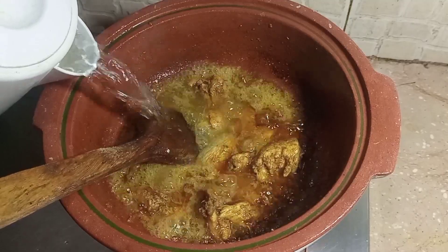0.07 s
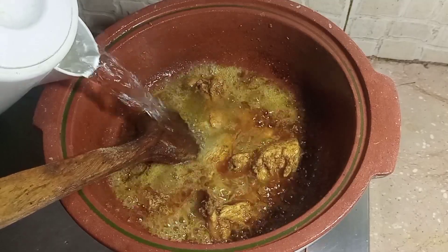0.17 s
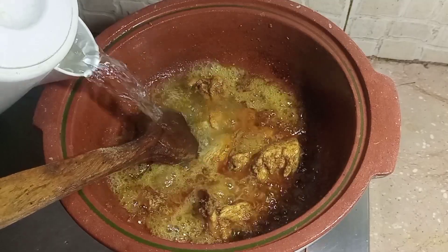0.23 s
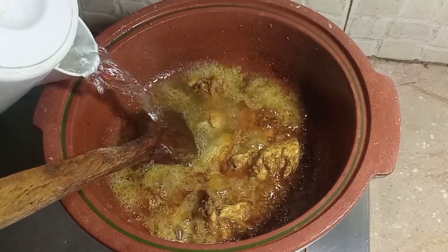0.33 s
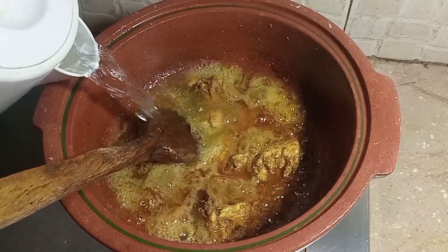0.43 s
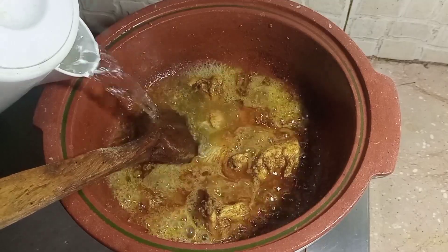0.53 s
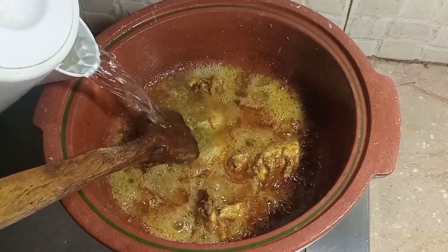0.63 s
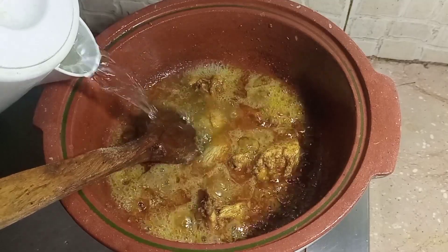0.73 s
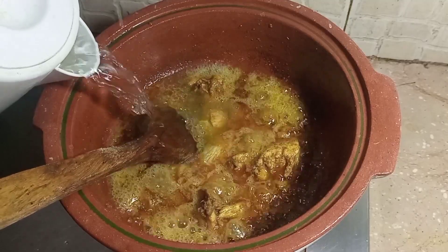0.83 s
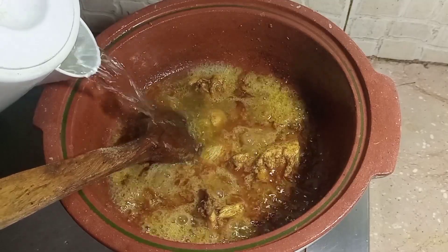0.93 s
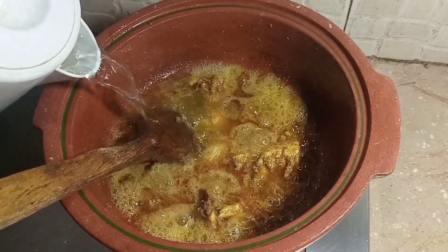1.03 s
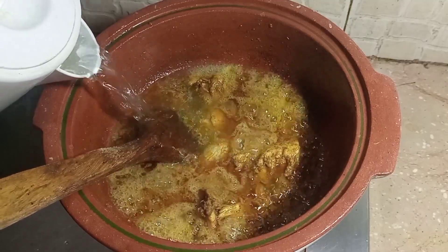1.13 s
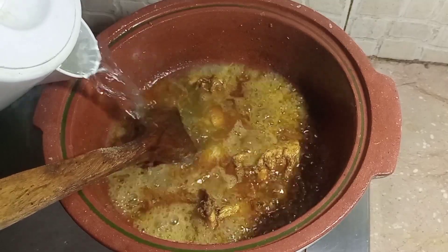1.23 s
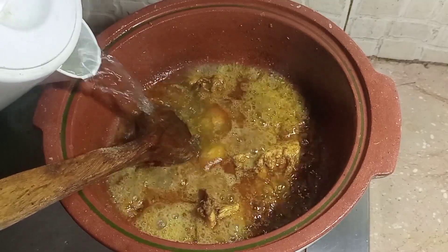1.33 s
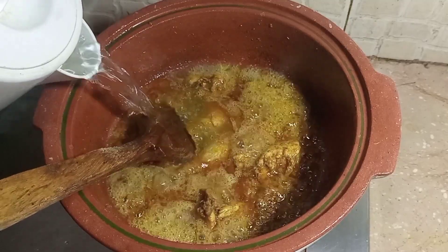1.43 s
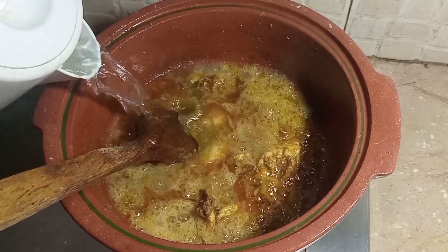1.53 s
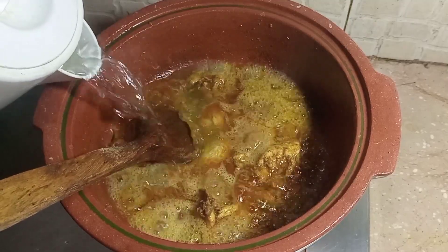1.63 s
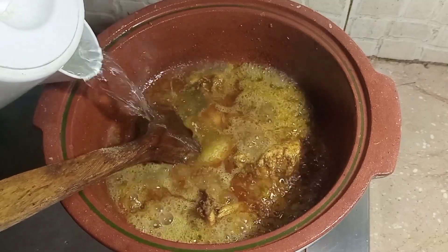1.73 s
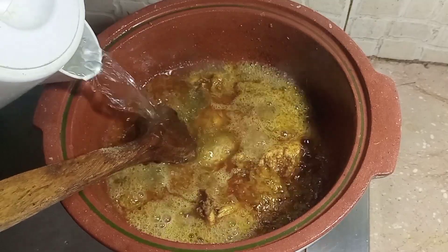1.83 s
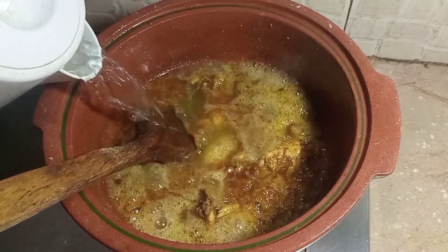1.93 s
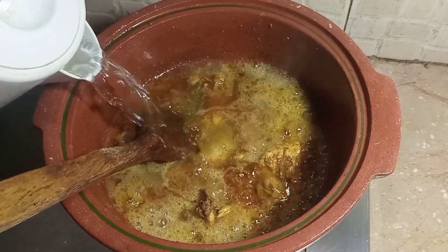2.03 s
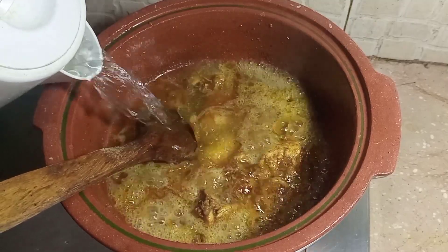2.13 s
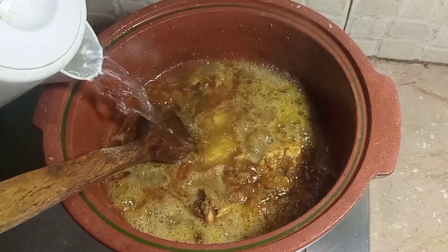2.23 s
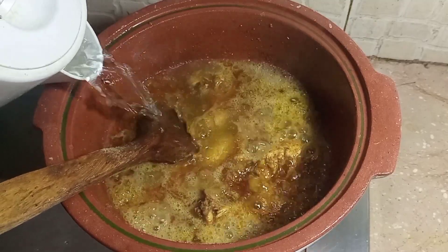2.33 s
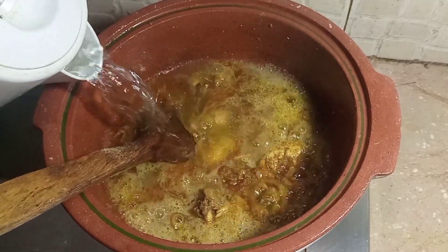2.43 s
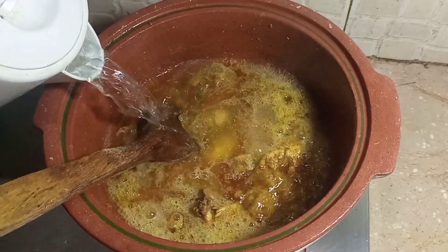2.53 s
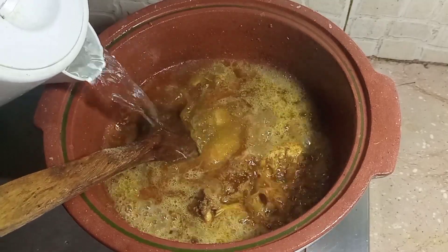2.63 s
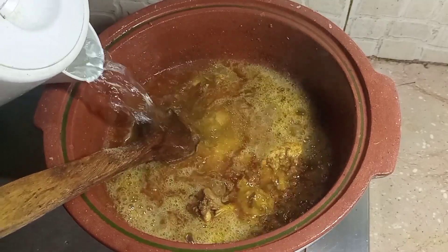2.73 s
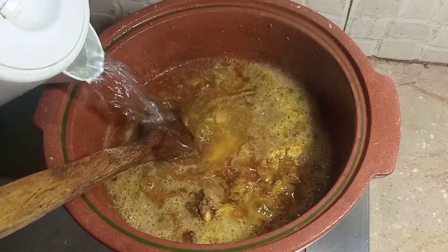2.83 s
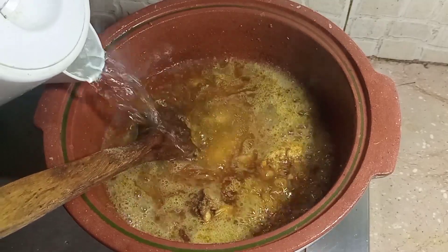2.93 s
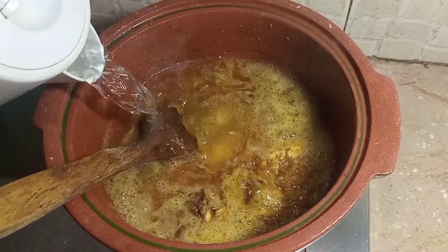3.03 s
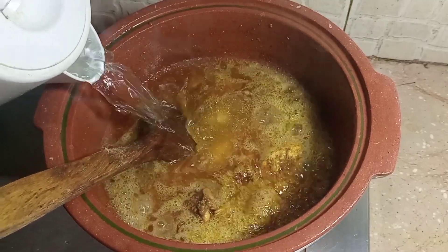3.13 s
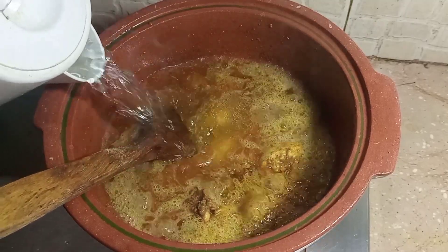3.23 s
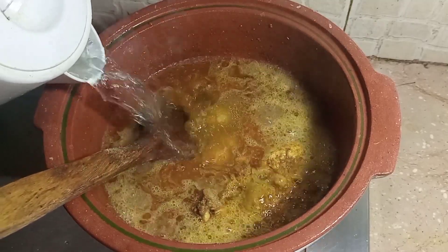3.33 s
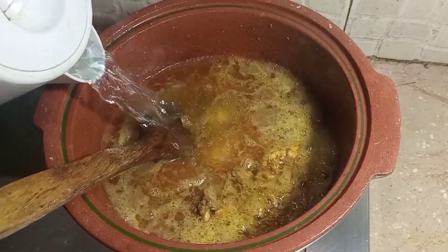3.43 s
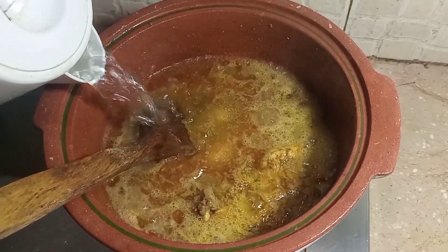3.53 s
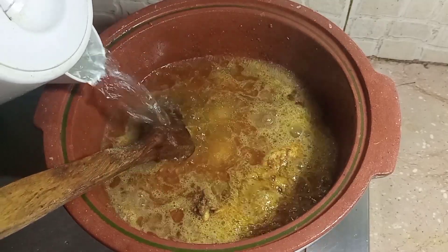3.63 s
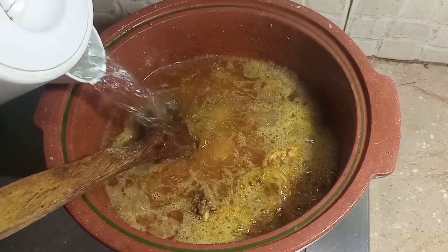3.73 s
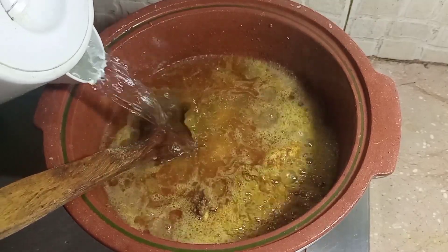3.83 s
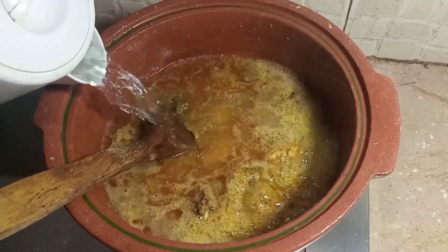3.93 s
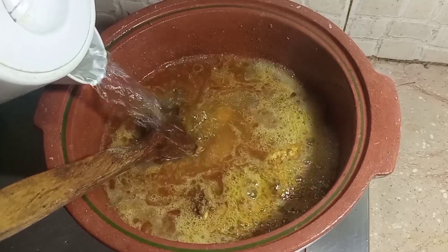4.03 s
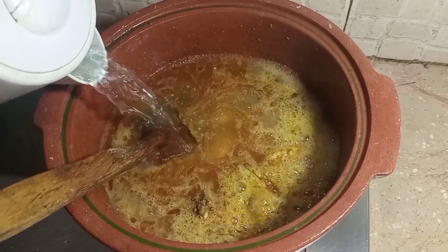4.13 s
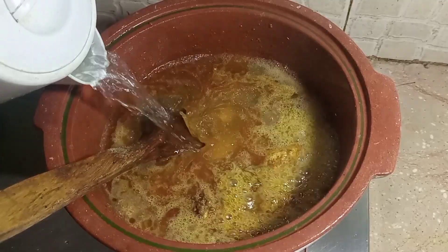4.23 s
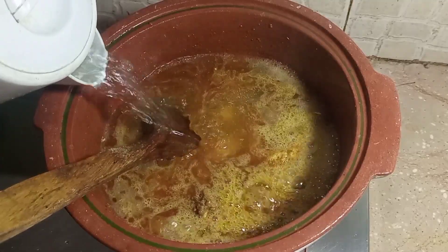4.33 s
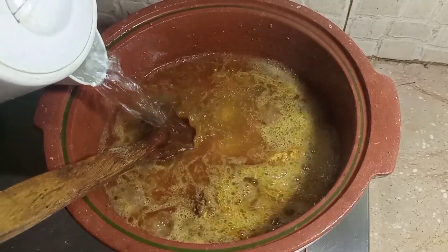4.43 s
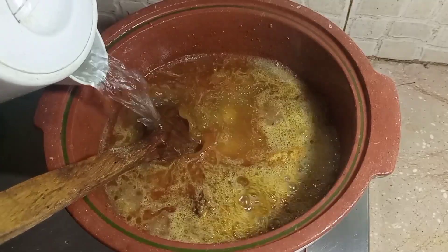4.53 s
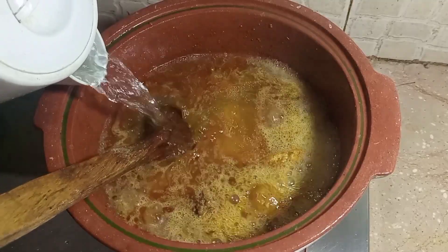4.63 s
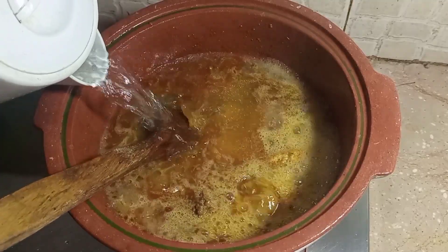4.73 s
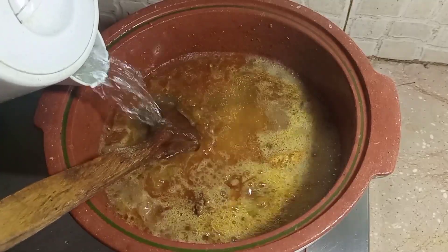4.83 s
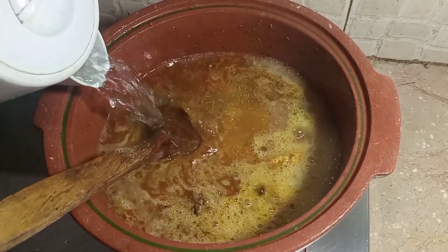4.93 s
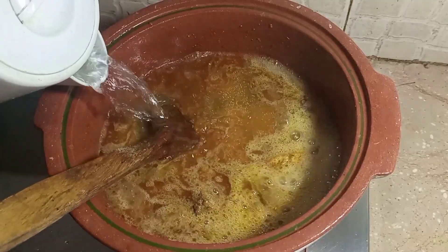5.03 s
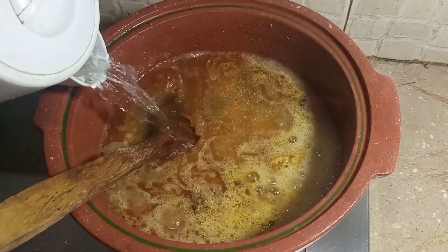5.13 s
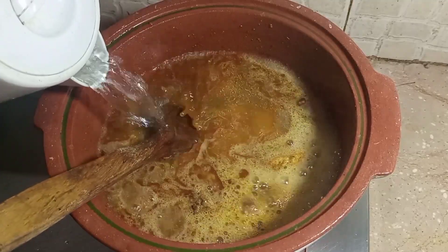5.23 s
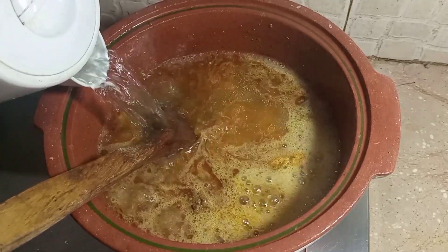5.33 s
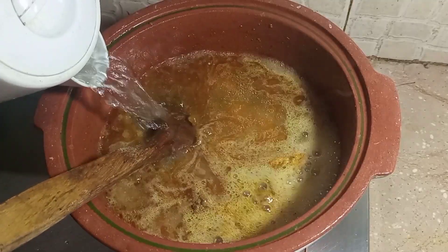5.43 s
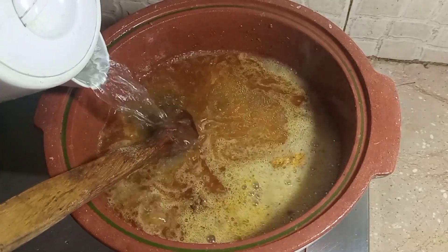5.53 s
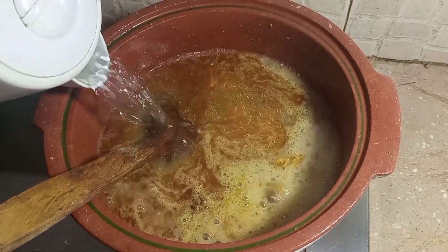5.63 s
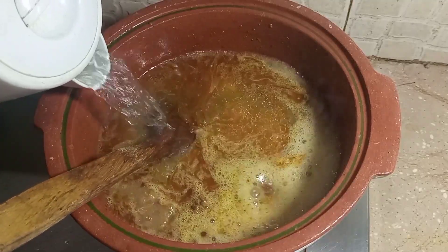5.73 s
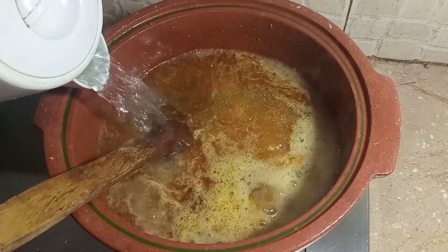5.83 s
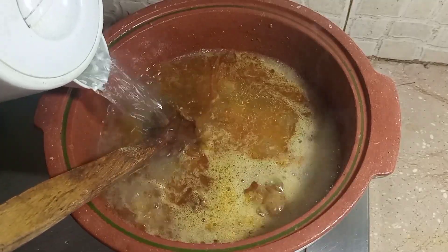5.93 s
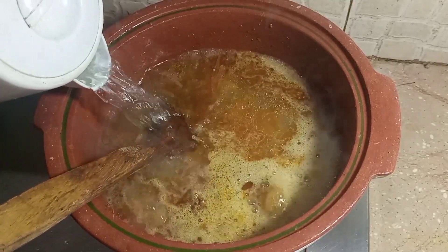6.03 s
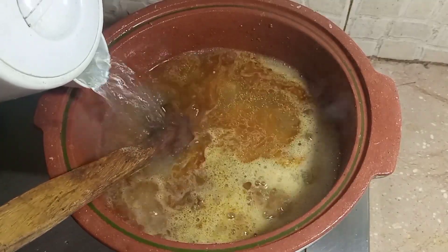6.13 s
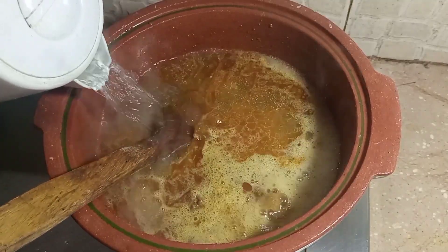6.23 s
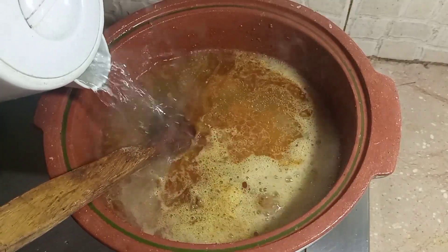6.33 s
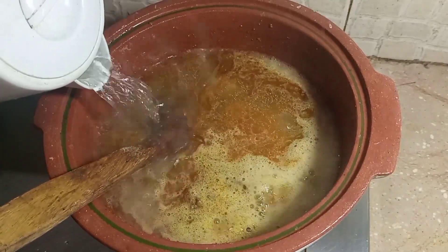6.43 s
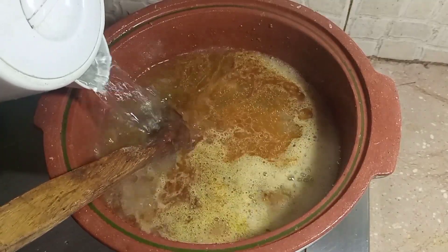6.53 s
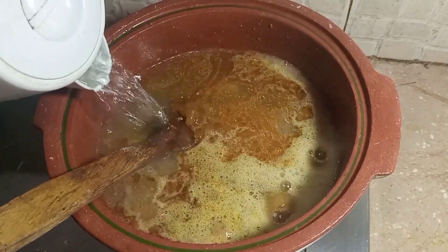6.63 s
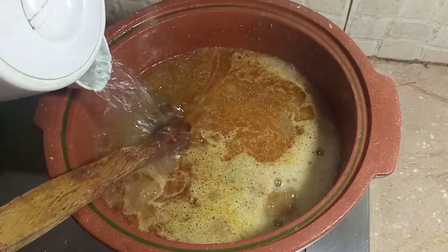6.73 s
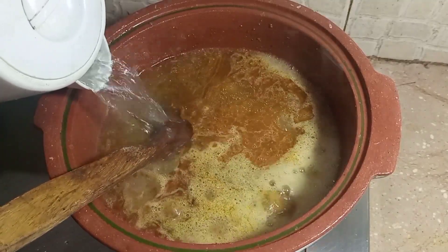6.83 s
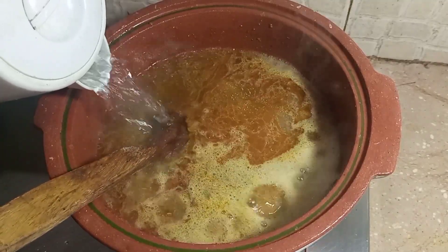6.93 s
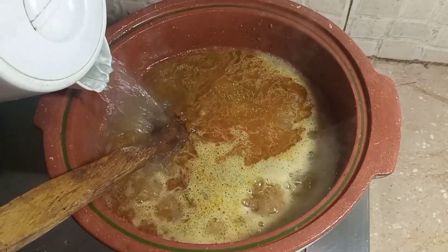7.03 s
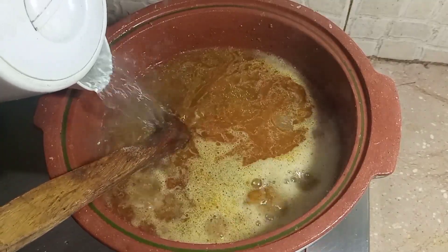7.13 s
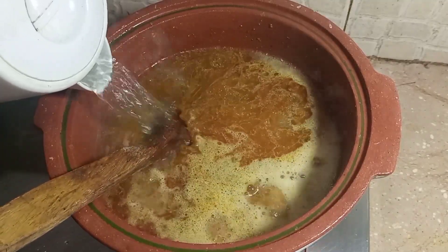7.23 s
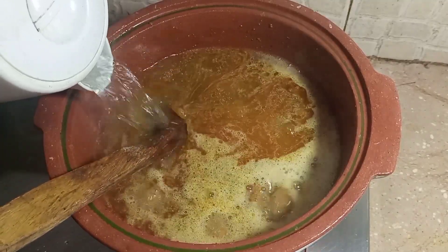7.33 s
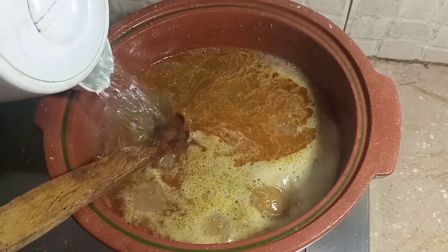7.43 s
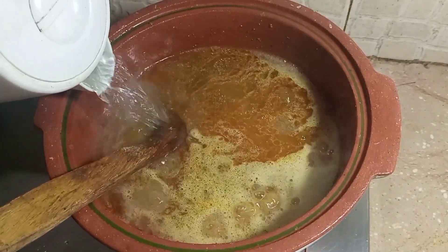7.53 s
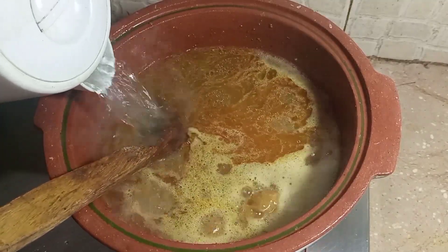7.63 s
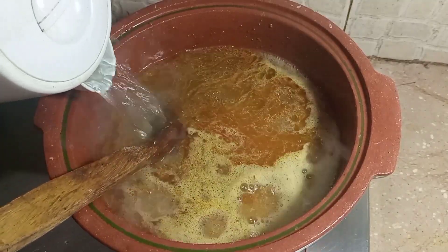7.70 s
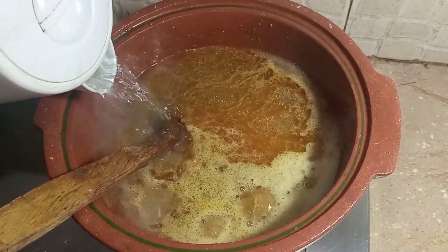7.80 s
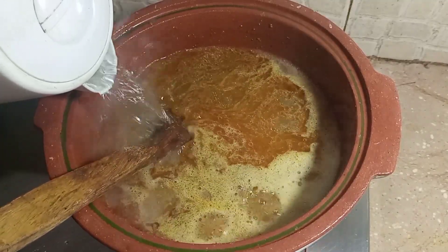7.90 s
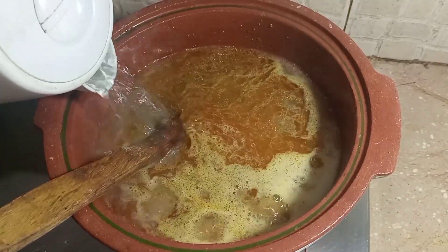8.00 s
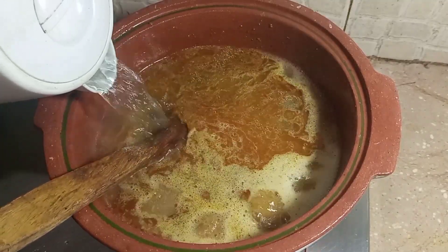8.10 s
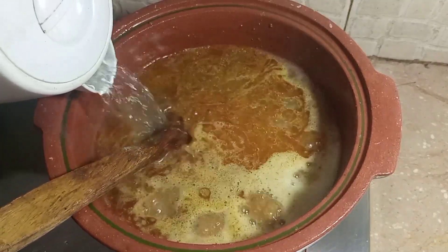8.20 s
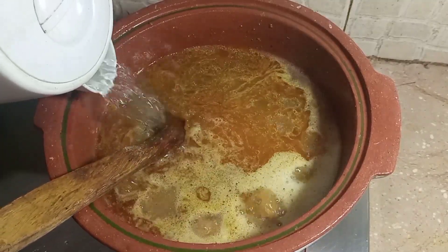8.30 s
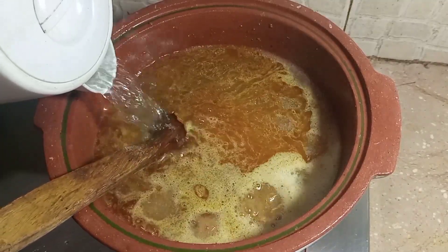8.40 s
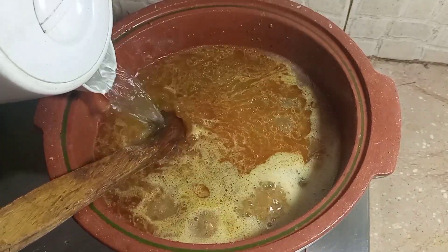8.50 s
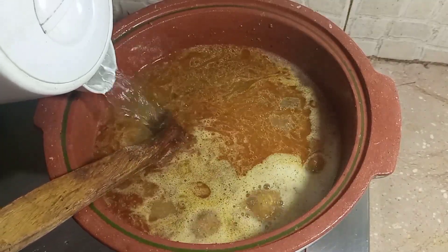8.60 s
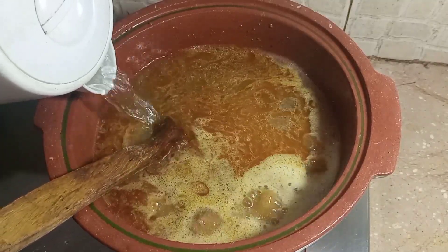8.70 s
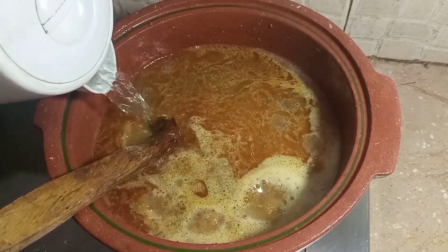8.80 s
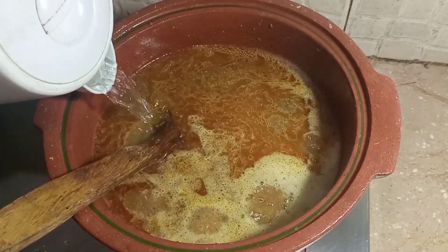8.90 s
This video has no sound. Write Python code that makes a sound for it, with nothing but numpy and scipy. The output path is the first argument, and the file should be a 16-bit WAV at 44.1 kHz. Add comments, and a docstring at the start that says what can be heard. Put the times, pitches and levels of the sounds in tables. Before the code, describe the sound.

Close to a clay pot in a tiled kitchen, poured water meets hot oil with a loud, bright, crackling sizzle. It surges early, with sharp snaps and spits, then weakens sharply around the middle as the pot cools. Gurgles, plops and dull thuds become clearer over a thinning simmer, and a soft hollow hoot sounds near the end.

```python
"""A loud sizzle, made of countless tiny steam bursts, thins to a simmer as the pot cools.
Water runs from a jug into a clay pot of chicken frying in hot oil, in a tiled kitchen.
Random clicks excite resonances for the sizzle and gurgle; damped, rising sines make bubbles, plops and drips.
Oil spits and thuds add shaped noise, glugs are wobbling tones; near the end comes one soft hollow hoot."""
import sys
import numpy as np
from scipy import signal
from scipy.fft import rfft, irfft
from scipy.io import wavfile

SR = 44100
rng = np.random.default_rng(int(sys.argv[2]) if len(sys.argv) > 2 else 0)


def unload_audio(sound):
    """Save the sound as a 16-bit wav file, at the path given as the first command line argument."""
    columns = np.transpose(np.atleast_2d(sound))
    # keep every value between -1 and 1, then stretch to whole-number steps
    steps = np.round(np.clip(columns, -1, 1) * 32767)
    wavfile.write(sys.argv[1], SR, steps.astype(np.int16))


N = 395116
TIME = np.arange(N) / SR
CUTOFF_HZ = 15480


def from_db(db):
    """Decibels to gain."""
    return 10 ** (np.asarray(db) / 20)


def rms_one(x):
    """Scale to rms 1."""
    return x / np.sqrt(np.mean(x ** 2) + 1e-20)


def in_time(rows):
    """Interpolate each column of a time curve to every sample."""
    s, *columns = np.transpose(rows)
    return [np.interp(TIME, s, column) for column in columns]


def highpass(x, order, hz):
    """Butterworth high-pass."""
    return signal.sosfilt(signal.butter(order, hz, "high", fs=SR, output="sos"), x)


def drift(rate_hz):
    """Slow random curve of rms 1: noise through two equal poles at rate_hz."""
    step = 40  # samples per point of the slow curve
    settling = 2000  # points dropped while the filter settles
    r = np.exp(-2 * np.pi * rate_hz * step / SR)
    noise = rng.standard_normal(N // step + settling + 2)
    slow = rms_one(signal.lfilter([1], [1, -2 * r, r * r], noise)[settling:])
    return np.interp(np.arange(N) / step, np.arange(len(slow)), slow)


def colour(x, spectrum, size=4096):
    """Causal minimum-phase filter with the given spectrum, built by folding its cepstrum."""
    hz, db = np.transpose(spectrum)
    grid_hz = np.maximum(np.arange(size // 2 + 1) * SR / size, 1)
    gain = from_db(np.interp(np.log(grid_hz), np.log(hz), db))
    cepstrum = irfft(np.log(gain))
    cepstrum[1:size // 2] *= 2
    cepstrum[size // 2 + 1:] = 0
    impulse = irfft(np.exp(rfft(cepstrum)))
    return signal.oaconvolve(x, impulse)[:N]


def resonate(x, hz, width_hz):
    """One two-pole resonance, gain 1 at its peak."""
    r = np.exp(-np.pi * width_hz / SR)
    zeros = np.array([1, 0, -1]) * (1 - r * r) / 2
    poles = [1, -2 * r * np.cos(2 * np.pi * hz / SR), r * r]
    return signal.lfilter(zeros, poles, x + 1e-18)


def add(out, s, sound):
    """Mix a short sound in at time s."""
    start = max(round(s * SR), 0)
    out[start:start + len(sound)] += sound[:N - start]


def bursts(per_s, spread_db):
    """Random clicks of uneven size; their power stays the same whatever their rate."""
    chance = np.clip(per_s / SR, 1e-5, 1) * np.ones(N)
    at = np.flatnonzero(rng.random(N) < chance)
    size = from_db(spread_db * np.minimum(rng.exponential(1, len(at)), 4))
    sign = rng.choice([-1, 1], len(at))
    out = np.zeros(N)
    out[at] = size * sign / np.sqrt(chance[at])
    return rms_one(out)


def bubbles(per_s, low_hz, high_hz, sharpness, spread_db, patchy_db, count=14):
    """Bubbles of many sizes ring for a few cycles each; every size comes in its own flurries."""
    out = 0
    for hz in np.geomspace(low_hz, min(high_hz, CUTOFF_HZ), count):
        ringing = resonate(bursts(per_s / count, spread_db), hz, hz / sharpness)
        out = out + ringing * from_db(patchy_db * drift(22.0))
    return rms_one(out)


def pop(hz, cycles, rise, size=2600):
    """A bubble: a sine damped by 1/e every `cycles`, its pitch climbing for two decay times."""
    turns = hz * TIME[:size]
    decays = turns / cycles
    phase = 2 * np.pi * turns * (1 + rise * np.minimum(decays, 2))
    return np.sin(phase) * np.exp(-np.minimum(decays, 40))


def tail(t60_s, size=22050):
    """A dense echo train of unit energy that dies away."""
    t = np.arange(size) / SR
    echoes = rng.standard_normal(size) * from_db(-60 * t / t60_s) * (t > .0007)
    return echoes / np.linalg.norm(echoes)


POT_T60_S = 0.12


def scatter(x, wet_db):
    """Each spot in the pot has its own short train of echoes off the clay walls."""
    return x + from_db(wet_db) * signal.oaconvolve(x, tail(POT_T60_S, size=2600))[:len(x)]


# vigour of the frying: t/s, fine sizzle level/dB, coarse crackle level/dB, finest spray level/dB
FRYING = [(0.0, -48, -49.5, -58), (1.27, -42, -47.5, -48.5), (2.67, -45, -47, -52),
          (3.69, -42.5, -49.5, -49.5), (3.92, -42, -52, -50), (4.44, -47, -53.5, -52.5),
          (4.79, -53, -56, -58.5), (5.66, -57, -60, -64.5), (6.93, -58, -61, -66),
          (8.46, -63, -66.5, -71.5), (8.96, -63.5, -67.5, -70.5)]
# spectrum of each sizzle layer: f/Hz, level/dB
SIZZLE_COLOUR = [(1500, -26), (3000, -12.5), (4500, -9.5), (5400, -2), (6000, 1.5), (6600, 2.5), (7400, 1),
                 (8200, -7.5), (9500, -10.5), (12000, -37.5), (16000, -6.5)]
CRACKLE_COLOUR = [(900, -32.5), (1700, -16.5), (2300, -6), (3000, -4), (3700, -2), (4600, 0), (5600, -6),
                  (8000, -21.5), (16000, -32.5)]
SPRAY_COLOUR = [(3000, -16), (7000, 7), (9500, 4.5), (11500, 0.5), (13500, 1), (16000, -5.5)]


def sizzle():
    """Droplets flash to steam: sharp snaps and tiny ringing bubbles, fewer as the frying weakens."""
    fine_db, coarse_db, spray_db = in_time(FRYING)
    per_s = 16000 * from_db(.5 * (fine_db - fine_db.max()))
    surge = from_db(1.0 * drift(33.0))  # the stream lands unevenly
    cracks = rms_one(sum(scatter(bursts(per_s * .12, spread_db=4.0), wet_db=-1.0) for spot in range(4)))

    fine = bubbles(per_s, 4050, 8420, sharpness=12.3, spread_db=3.5, patchy_db=1.5)
    fine = rms_one(colour(fine + 1.1 * cracks, SIZZLE_COLOUR))
    coarse = bubbles(per_s * .45, 1870, 5640, sharpness=9.4, spread_db=2.5, patchy_db=0.74)
    coarse = rms_one(colour(coarse + 0.83 * cracks, CRACKLE_COLOUR))
    spray = bubbles(per_s, 8100, 15500, sharpness=11.0, spread_db=4.0, patchy_db=-0.1, count=8)
    spray = rms_one(colour(spray + 0.72 * cracks, SPRAY_COLOUR))

    layers = from_db(fine_db - 0.55) * fine + from_db(coarse_db - 0.67) * coarse + from_db(spray_db) * spray
    return surge * layers


# lone droplets snapping dry in the oil: t/s, level/dB
SNAPS = [(0.1624, -26), (0.44, -33), (0.8259, -29), (1.1782, -29), (1.5604, -25), (5.2779, -36),
         (5.5142, -35), (5.528, -37), (5.5545, -35), (5.874, -38), (5.9146, -36), (6.1415, -35),
         (6.201, -35), (6.2249, -36), (6.3754, -37), (6.53, -36), (6.6892, -35), (6.879, -36),
         (7.1275, -42), (7.2233, -37), (7.4584, -42), (7.6047, -36), (7.6657, -45), (7.7375, -41),
         (7.8236, -42), (8.091, -37), (8.2771, -40), (8.3348, -39), (8.3479, -41), (8.362, -41),
         (8.9425, -52)]
# spectrum of one snap: f/Hz, level/dB
SNAP_COLOUR = [(500, -25.5), (1500, -4), (4000, -3.5), (6500, -1), (9000, -2.5), (13500, -9.5),
               (15000, -16.5)]
SNAP_ECHO_DB, SNAP_ECHO_DECAY_S = -4.5, 0.00072  # first echoes off the clay
# small snaps: level at the height of the frying, share of its swing, biggest over smallest
SMALL_SNAP_DB, SMALL_SNAP_FOLLOWS, SMALL_SNAP_SPREAD_DB = -39, 0.52, 7.5


def snaps(count=260, size=1500):
    """A droplet bursts in one sharp pulse with a few close echoes; many smaller ones pepper the sizzle."""
    fine_db, = in_time(FRYING)[:1]
    level_db = SMALL_SNAP_DB + SMALL_SNAP_FOLLOWS * (fine_db - fine_db.max())
    small = []
    for when, strength in rng.random((count, 2)):
        db = level_db[int(when * N)] + SMALL_SNAP_SPREAD_DB * strength ** 3
        small.append((when * N / SR, db))
    impulse = signal.unit_impulse(size)
    click = colour(impulse, SNAP_COLOUR)[:size]
    out = np.zeros(N)
    for s, db in SNAPS + small:
        echoes = rng.standard_normal(size) ** 3 * np.exp(-TIME[:size] / SNAP_ECHO_DECAY_S)
        pulses = impulse + from_db(SNAP_ECHO_DB) * echoes / np.abs(echoes).max()
        snap = scatter(signal.oaconvolve(pulses, click)[:size], wet_db=-4.5)
        add(out, s, from_db(db - 1.5) * snap / np.abs(snap).max())
    return out


# oil spits: t/s, level/dB, ring f/Hz, sharp crack level/dB, sputter decay/s
SPITS = [(0.171, -34, 5400, -50, 0.0098), (0.1852, -30.5, 6670, -41, 0.0076),
         (0.3322, -28, 5250, -42, .001), (0.3813, -30, 4300, -42, 0.0034), (0.5336, -26, 5550, -40, .001),
         (0.623, -26.5, 5800, -44, .002), (0.6929, -26.5, 5160, -46, .0015), (0.726, -32, 4850, -40, .005),
         (0.7276, -21.5, 5560, -25.5, .0012), (1.301, -29, 3950, -44, 0.0027),
         (1.684, -24.5, 6600, -44, 0.0017), (1.9345, -32, 3800, -45, .001),
         (3.4704, -21.5, 6340, -41, .002), (3.9445, -30, 4280, -45, .001), (4.4154, -30.5, 5000, -35, .001),
         (6.1645, -44, 3250, -48, 0.0011), (6.47, -44, 5300, -41, .001), (6.6368, -53, 5100, -47, .001),
         (6.6595, -39.5, 3740, -59, .0015), (6.671, -47, 5100, -50, .001), (6.6887, -44, 7600, -47, .001),
         (6.9144, -34, 6360, -41, 0.001), (6.9455, -42, 3500, -40, 0.00092), (7.295, -49, 3000, -42, .002),
         (7.3472, -39, 6800, -29.5, .002), (7.4585, -48, 5000, -52, .001), (7.4937, -41, 6400, -43, .001),
         (7.5441, -34.5, 7000, -53, 0.0022), (7.5908, -41, 3370, -40, 0.002),
         (7.6042, -44, 3200, -45, .0015), (7.9016, -34.5, 6550, -51, 0.0013),
         (7.948, -44, 4500, -43, 0.00089), (8.0911, -41, 6400, -43, .001), (8.469, -40, 6100, -49, .0015),
         (8.729, -45, 5370, -49, .001), (8.849, -33.5, 6600, -35.5, 0.0012)]


def spits(size=2600):
    """Oil spits with a noise crack, a brief damped ring and a high, band-passed sputter."""
    out, t = np.zeros(N), TIME[:size]
    for (s, db, hz, crack_db, sputter_s), grit in zip(SPITS, rng.standard_normal((len(SPITS), 2, size))):
        crack = signal.lfilter([1], [1, -.45], grit[0] * np.exp(-t / 0.0009))
        crack = from_db(crack_db) * crack / np.abs(crack).max()
        band = resonate(resonate(grit[1], hz, 0.28 * hz), hz, 0.28 * hz)
        sputter = rms_one(band) * np.exp(-t / sputter_s)
        spit = from_db(db) * (0.84 * pop(hz, cycles=3.5, rise=0.03) + 0.48 * sputter)
        add(out, s, scatter(spit + crack, wet_db=-5.0))
    out = signal.sosfilt(signal.butter(4, 13200, fs=SR, output="sos"), out)
    return highpass(out, 2, 1700)


# resonances of the pot: f/Hz, width/Hz, level/dB
POT_RINGS = [(544, 29, 0.5), (647, 32, -1), (787, 84, 0), (937, 46, -6.5)]


def ring_pot(x, db):
    """A sound in the broth with the ringing of the pot added."""
    return x + sum(from_db(db + ring_db) * resonate(x, hz, width_hz) for hz, width_hz, ring_db in POT_RINGS)


# air in the pot and around it: f/Hz, width/Hz, level/dB
HOLLOW = [(111, 13.6, 0), (142, 21, -8.5), (177, 35, -5), (226, 31, -2), (257.4, 28.5, 5.5),
          (305, 30, -6.5), (400, 34, -13)]


def hollow(x):
    """Low resonances of the pot and the space around it, in alternating sign; nothing deeper radiates."""
    rings = 0
    for k, (hz, width_hz, db) in enumerate(HOLLOW):
        rings = rings + (-1) ** k * from_db(db) * resonate(x, hz, width_hz)
    return highpass(rings, 2, 62)


# churns hard until the water covers the bottom of the pot, then settles
CHURN_DB, COVERED_S, SETTLE_S, SETTLE_DB, CALM_DB_PER_S = -63.5, 2.75, 0.47, 13, 2.5


def churning():
    """Level of the churning in dB: steady, a quick drop once the bottom is covered, then a slow fade."""
    since = TIME - COVERED_S
    drop_db = SETTLE_DB * (1 + np.tanh(since / SETTLE_S)) / 2
    return CHURN_DB - drop_db - CALM_DB_PER_S * np.maximum(since, 0)


# bubbling of the broth: t/s, level/dB
BROTH = [(0.05, -55), (1.59, -53), (4.27, -58), (5.53, -64), (6.9, -66), (7.55, -65), (7.68, -71),
         (7.8, -67), (8.06, -75), (8.3, -74.5), (8.43, -71.5), (8.78, -72.5), (8.96, -69)]
# spectrum of the bubbling: f/Hz, level/dB
BUBBLING_COLOUR = [(200, -24), (440, -13.5), (540, -3), (700, -1.5), (900, -6), (1400, 1.5), (1800, -3.5),
                   (2300, -10), (4000, -12)]
# the clay wall rings most under a hard boil
WALL_RING_HZ, WALL_RING_WIDTH_HZ, WALL_RING_DB = 2000, 55, 6.5


def gurgle():
    """Larger bubbles in the broth ring the pot; the churning liquid sounds its hollow."""
    bubbling_db, = in_time(BROTH)
    vigour = from_db(.45 * (bubbling_db - bubbling_db.max()))
    small = bubbles(1500 * vigour, 673, 2280, sharpness=5.9, spread_db=1.0, patchy_db=0.5)
    small = highpass(small + 1.55 * bursts(1200 * vigour, spread_db=1.5), 5, 620)
    # the deepest bubbles fade fastest as the boil weakens
    big = bubbles(700, 496, 685, sharpness=3.0, spread_db=2.5, patchy_db=3.0, count=4)
    big = 0.66 * vigour ** 1.8 * big
    broth = ring_pot(colour(small + big, BUBBLING_COLOUR), db=1.0)
    wall = resonate(broth, WALL_RING_HZ, WALL_RING_WIDTH_HZ)
    broth = broth + from_db(WALL_RING_DB) * vigour * wall
    churn = bursts(260, spread_db=3.0) * from_db(1.9 * drift(9.0))
    return from_db(bubbling_db + 0.9) * rms_one(broth) + from_db(churning()) * rms_one(hollow(churn))


# weakest pocket against the churning; biggest over smallest
BURBLE_DB, BURBLE_SPREAD_DB = -2, 11.5


def burble(count=150, size=6000):
    """Air pockets of all sizes come up through the churning liquid, each with a short rising note."""
    level_db, out = churning() + BURBLE_DB, np.zeros(N)
    swell = 1 - np.exp(-TIME[:size] / 0.0025)
    for when, pitch, strength in rng.random((count, 3)):
        note = pop(130 * 4.5 ** pitch, cycles=3.5, rise=0.11, size=size) * swell
        db = level_db[int(when * N)] + BURBLE_SPREAD_DB * strength ** 2
        add(out, when * N / SR, from_db(db) * note)
    return out


# level at the height of the frying, share of its swing, biggest over smallest
FOAM_DB, FOAM_FOLLOWS, FOAM_SPREAD_DB = -51, 0.46, 11


def foam(count=560):
    """Single foam bubbles tick at all pitches and stand out more as the sizzle thins."""
    coarse_db, out = in_time(FRYING)[1], np.zeros(N)
    level_db = FOAM_DB + FOAM_FOLLOWS * (coarse_db - coarse_db.max())
    for when, pitch, strength in rng.random((count, 3)):
        tick = pop(950 * 9.0 ** pitch, cycles=.8 + 1.8 * pitch, rise=0.042)
        db = level_db[int(when * N)] + 12 * pitch + FOAM_SPREAD_DB * strength ** 4
        add(out, when * N / SR, scatter(from_db(db) * tick, wet_db=-6.5))
    return ring_pot(highpass(out, 4, 660), db=0)


# blisters bursting: t/s, level/dB, ring f/Hz, ring decay/cycles
PLOPS = [(0.837, -37.5, 1400, .8), (1.107, -45, 710, 2), (2.431, -41, 770, 1.8), (2.517, -39, 740, 2),
         (2.548, -43, 1980, .8), (2.977, -41.5, 646, 2), (3.073, -46, 695, 1.8), (3.344, -44, 666, 2),
         (4.059, -45, 743, 1), (4.193, -38, 1450, .8), (4.341, -43, 785, 1), (4.383, -41, 1290, .8),
         (4.84, -40, 860, 0.59), (5.01, -43, 1590, 1), (5.078, -46, 1040, 2), (5.3045, -40.5, 700, 2),
         (5.754, -42, 970, 1.4), (5.944, -44.5, 880, 1), (5.961, -51, 780, 2), (5.983, -49, 1720, 1),
         (6.186, -44, 900, .8), (6.318, -42.5, 1020, 2), (6.376, -49, 1480, 1), (6.6667, -50, 1060, 1),
         (6.689, -54, 1030, .8), (6.7262, -43, 1000, 0.78), (6.7594, -43, 1770, 0.61),
         (6.862, -40, 2290, 0.83), (6.946, -51, 1080, 1), (6.96, -41, 1360, .7), (7.0816, -48, 1200, .7),
         (7.1683, -46, 1250, .7), (7.204, -48, 830, 1.1), (7.2274, -46, 1000, 0.63),
         (7.346, -42, 890, 0.62), (7.405, -49, 1370, 1.3), (7.4577, -43.5, 835, 1), (7.494, -51, 870, .8),
         (7.741, -49, 1770, 1.5), (7.7764, -45, 1870, .8), (7.8231, -53, 1330, .7),
         (7.9485, -54.5, 900, .8), (8.0115, -49, 1630, .7), (8.0911, -67, 1480, .8), (8.1498, -55, 1150, 2),
         (8.411, -55, 1180, 2), (8.4786, -49.5, 1510, .8), (8.5, -49, 1350, .8), (8.694, -52, 1500, 1),
         (8.849, -44, 1500, .7), (8.928, -58, 850, 2)]


def plops(size=2600):
    """Large blisters open at the surface: the film snaps and the cavity rings."""
    out = np.zeros(N)
    for (s, db, hz, cycles), grit in zip(PLOPS, rng.standard_normal((len(PLOPS), size))):
        snap = resonate(grit * np.exp(-TIME[:size] / 0.0036), hz, 2 * hz)
        cavity = resonate(pop(hz, cycles, rise=0.012), hz, 1.14 * hz)
        plop = cavity / np.abs(cavity).max() + 0.36 * snap / np.abs(snap).max()
        add(out, s, scatter(from_db(db - 0.4) * plop, wet_db=-7.5))
    return ring_pot(highpass(out, 5, 530), db=-8)


# drops from the stream, each trapping a bubble: t/s, level/dB, f/Hz
DRIPS = [(0.381, -34.5, 3750), (0.66, -46, 1950), (0.86, -37, 3750), (1.149, -39.5, 3050),
         (1.302, -41, 3520), (6.835, -54, 2340), (6.885, -51, 2850), (7.305, -53, 2280),
         (7.718, -50.5, 2000), (8.742, -57, 1550)]
DRIP_DECAY_S = 0.0039


def drips():
    """Small trapped bubbles give short, rising chirps."""
    out = np.zeros(N)
    for s, db, hz in DRIPS:
        chirp = pop(hz, cycles=DRIP_DECAY_S * hz, rise=0.047)
        add(out, s, scatter(from_db(db) * chirp, wet_db=-3.0))
    return out


# steam pockets collapsing deep in the liquid: t/s, level/dB, centre f/Hz, relative heave level/dB
THUDS = [(3.069, -58, 254, -13), (4.149, -61, 265, -2), (4.771, -62.5, 262, -2), (5.062, -55, 275, 0),
         (5.799, -57.5, 280, 3), (5.993, -54, 258, 0), (6.37, -58, 245, -1), (6.652, -61.5, 275, -4),
         (6.804, -60.5, 251, 1), (7.347, -67, 275, -7), (8.853, -67, 262, -14)]


def thuds(size=12000):
    """A steam pocket collapses with a dull bump and a short shudder; the liquid heaves below it."""
    t, out = TIME[:size], np.zeros(N)
    for (s, db, hz, heave_db), noise in zip(THUDS, rng.standard_normal((len(THUDS), 3, size))):
        bump = rms_one(resonate(noise[2], 280, 340)) * np.exp(-t / 0.008)
        heave = from_db(heave_db) * rms_one(resonate(noise[1], 118, 94))
        heave = heave * (1 - np.exp(-t / 0.0053)) * np.exp(-t / 0.033)
        shudder = rms_one(resonate(noise[0], hz, 0.085 * hz)) * np.exp(-t / 0.032)
        thud = (0.82 * bump + shudder + heave) * (1 - np.exp(-t / 0.0012))
        add(out, s, from_db(db + 4.0) * thud / np.abs(thud).max())
    return signal.sosfilt(signal.butter(2, [55, 480], "band", fs=SR, output="sos"), out)


# the stream drags air under: t/s, length/s, level/dB, start f/Hz, end f/Hz
GLUGS = [(0.4, .15, -70, 112, 120), (1.417, 0.25, -68, 109, 102), (1.561, 0.15, -64, 249, 273.5),
         (1.851, 0.12, -65.5, 264, 247), (2.017, .08, -68, 270, 240), (2.31, .12, -71, 118, 108),
         (2.415, 0.047, -69, 251, 262), (2.468, 0.12, -61, 277, 256), (2.61, 0.09, -68, 165, 182),
         (2.77, 0.16, -73, 332, 362), (3.218, .11, -73, 370, 395), (3.245, 0.075, -71, 270, 250),
         (3.317, 0.088, -64, 252, 273), (3.57, 0.06, -73.5, 382, 405), (3.7, 0.21, -73.5, 115, 106),
         (3.872, .07, -77, 335, 305), (4.204, 0.06, -71, 265, 255), (4.838, 0.048, -74, 266, 256),
         (5.09, 0.075, -69, 195, 175), (5.39, .06, -73, 118, 126), (6.062, 0.084, -71.5, 340, 262),
         (6.39, 0.08, -74, 134, 115), (6.82, 0.067, -74, 190, 140), (8.596, 0.07, -79, 245, 245)]
GLUG_WOBBLE, GLUG_WAVER_DB = 0.07, 3  # rms unsteadiness of pitch (share) and level


def glugs():
    """A trapped pocket of air swells and fades; its pitch slides and wobbles as it changes shape."""
    out = np.zeros(N)
    wobble = 1 + GLUG_WOBBLE * drift(35)
    waver = from_db(GLUG_WAVER_DB * drift(30))
    for s, length_s, db, start_hz, end_hz in GLUGS:
        at = np.flatnonzero((TIME > s) & (TIME < s + length_s))
        done = (TIME[at] - s) / length_s
        pitch_hz = (start_hz + (end_hz - start_hz) * done) * wobble[at]
        tone = np.sin(2 * np.pi * np.cumsum(pitch_hz) / SR)
        out[at] += from_db(db + 4.5) * waver[at] * np.sin(np.pi * done ** 0.69) * tone
    return out


# parts of the hoot: t/s, swell/s, held/s, start f/Hz, sag/(Hz/s), rms level/dB, fade/(dB/s)
HOOT = [(8.296, 0.021, 0.11, 250.3, 367, -51.5, 122), (8.345, 0.013, 0.025, 340, -1700, -70, 0),
        (8.365, 0.14, 0.31, 403, 35, -65.5, 14)]
# ringing air of the kitchen: f/Hz, width/Hz, level/dB
HOOT_RINGS = [(254.5, 3.3, 6), (196, 3.8, 5), (294, 3.7, 14)]
HOOT_RELEASE_S, HOOT_WAVER_DB = 0.022, 1.8  # decay time after a part; rms unsteadiness of level


def hoot():
    """A soft, pure hoot: a short low note slides down and fades, then breaks upward into a long, faint one."""
    out = 0
    for s, swell_s, held_s, hz, sag_hz_per_s, db, fade_db_per_s in HOOT:
        t = np.maximum(TIME - s, 0)
        sounding = np.minimum(t, held_s)
        envelope = np.minimum(t / swell_s, 1) * np.exp(-np.maximum(t - held_s, 0) / HOOT_RELEASE_S)
        level_db = db - fade_db_per_s * sounding + HOOT_WAVER_DB * drift(43)
        pitch_hz = hz - sag_hz_per_s * sounding
        tone = np.sin(2 * np.pi * np.cumsum(pitch_hz) / SR)
        out = out + np.sqrt(2) * from_db(level_db) * envelope * tone
    # lingering rings beat against the fading low note
    return out + sum(from_db(db) * resonate(out, hz, width_hz) for hz, width_hz, db in HOOT_RINGS)


# spectrum of the still kitchen: f/Hz, level/dB
FLOOR_COLOUR = [(20, -4), (60, -11.5), (110, 7), (250, -4), (500, -12), (2000, -14)]
FLOOR_RMS_DB = -82


def kitchen_floor():
    """Steady coloured noise of the still kitchen."""
    return from_db(FLOOR_RMS_DB) * rms_one(colour(rng.standard_normal(N), FLOOR_COLOUR))


KITCHEN_T60_S = 0.14
# the pot's walls cancel a narrow band; depth is a share of its amplitude
POT_DIP_HZ, POT_DIP_WIDTH_HZ, POT_DIP_DEPTH = 2203, 94, 0.44


def scene():
    """The pot is close; the kitchen answers faintly."""
    pot = sizzle() + snaps() + gurgle() + burble() + foam() + spits() + plops() + drips() + thuds() + glugs()
    pot = pot - POT_DIP_DEPTH * resonate(pot, POT_DIP_HZ, POT_DIP_WIDTH_HZ)
    kitchen = from_db(-10.5) * signal.oaconvolve(pot, tail(KITCHEN_T60_S))[:N]
    floor = kitchen_floor()
    return (pot + kitchen + hoot() + floor)[None]


# response with the port resonance: f/Hz, level/dB
MIC_COLOUR = [(20, -2.5), (13000, 0.5), (13900, 0.5), (14300, 11), (14650, 17), (15000, 16.5), (15400, 18),
              (16500, 5)]


def record(dry):
    """The microphone port rings in the top treble; a steep low-pass cuts the sound above CUTOFF_HZ."""
    steep = signal.ellip(12, .2, 75, CUTOFF_HZ, fs=SR, output="sos")
    return signal.sosfilt(steep, colour(dry[0], MIC_COLOUR))[None]


dry = scene()
out = record(dry)
unload_audio(out)
```